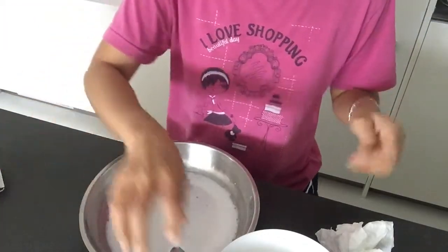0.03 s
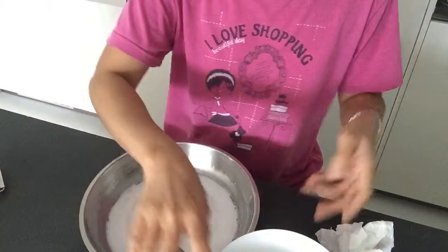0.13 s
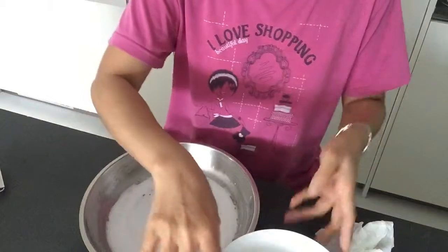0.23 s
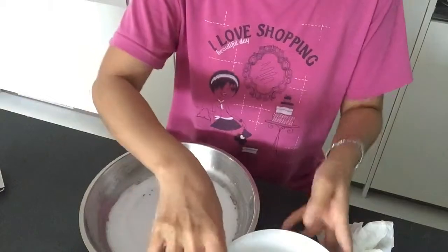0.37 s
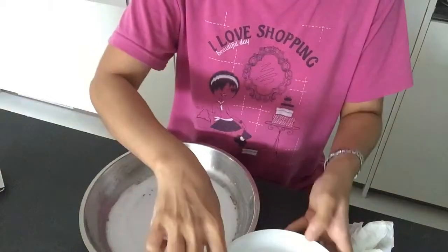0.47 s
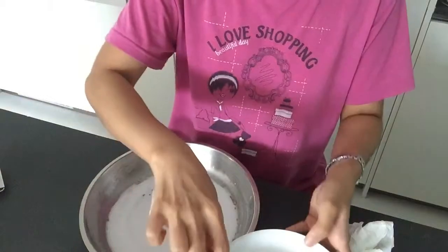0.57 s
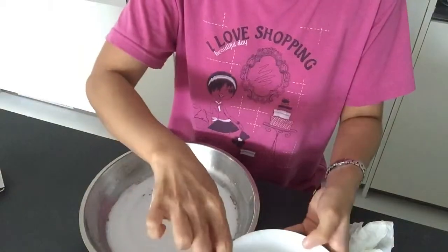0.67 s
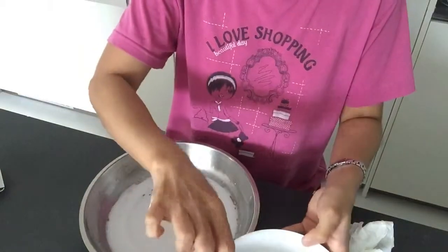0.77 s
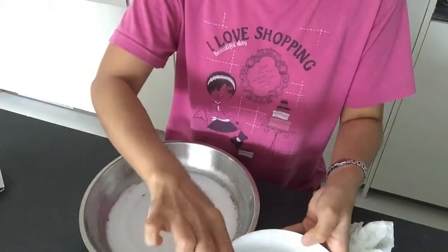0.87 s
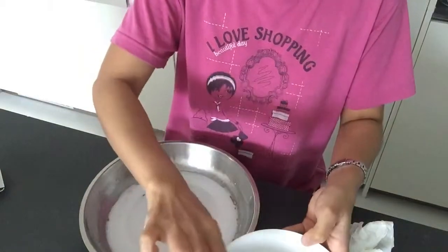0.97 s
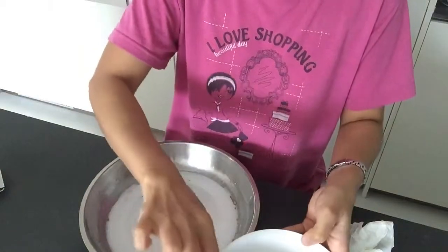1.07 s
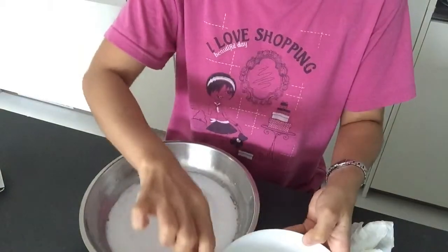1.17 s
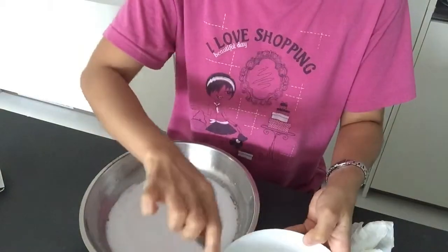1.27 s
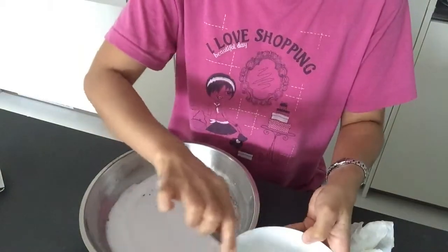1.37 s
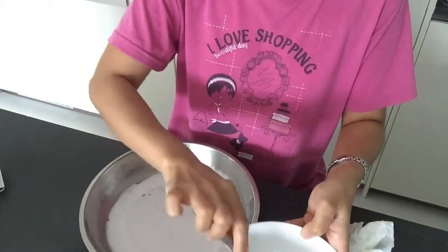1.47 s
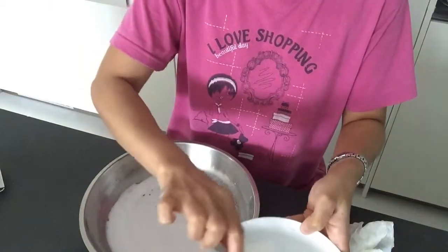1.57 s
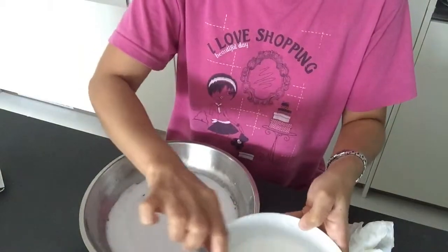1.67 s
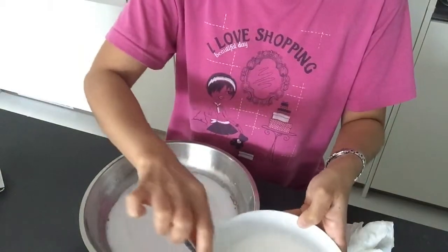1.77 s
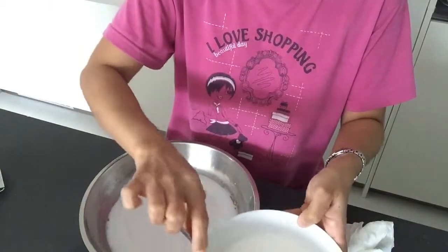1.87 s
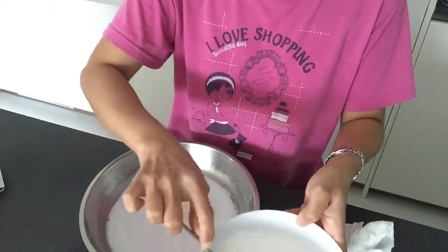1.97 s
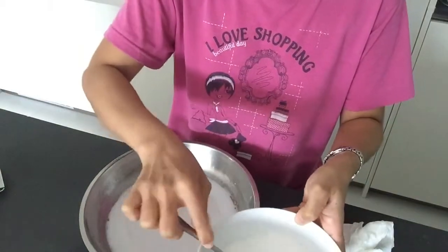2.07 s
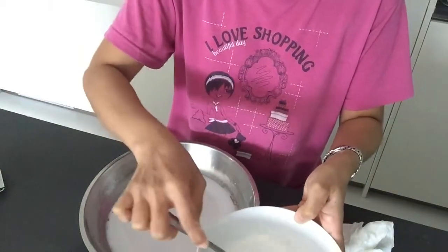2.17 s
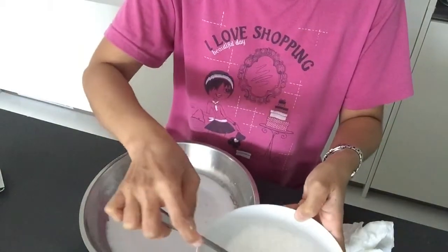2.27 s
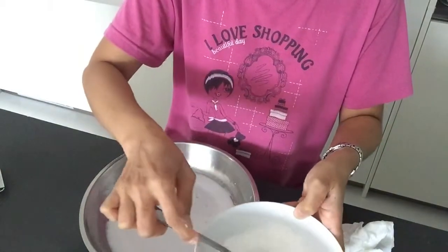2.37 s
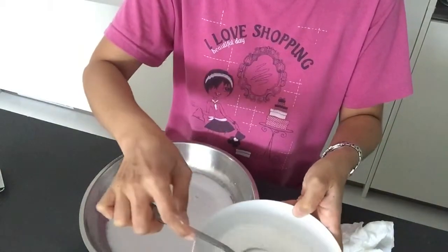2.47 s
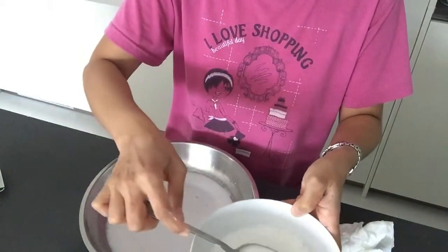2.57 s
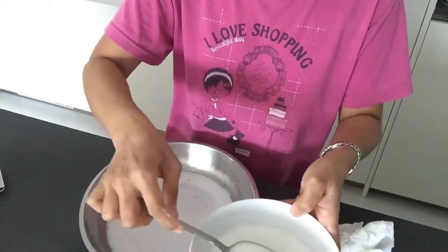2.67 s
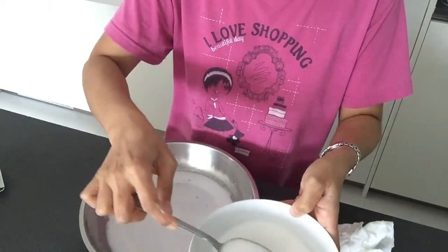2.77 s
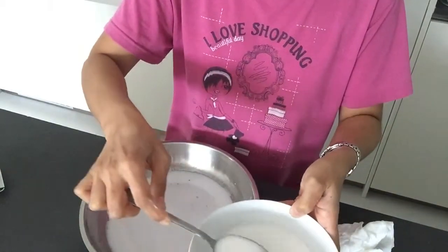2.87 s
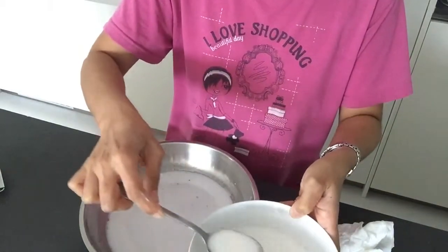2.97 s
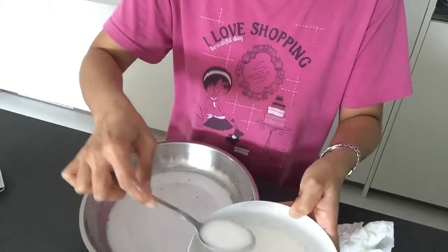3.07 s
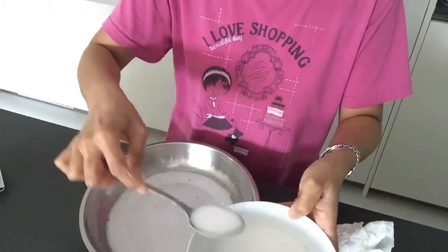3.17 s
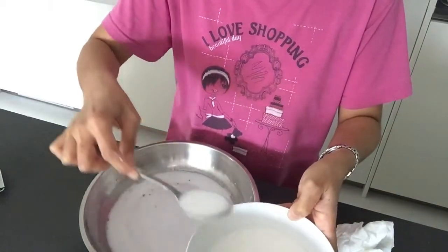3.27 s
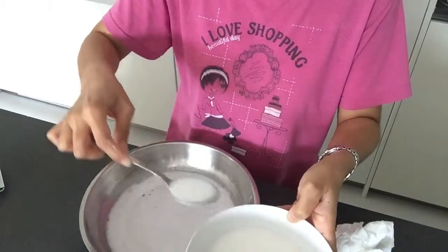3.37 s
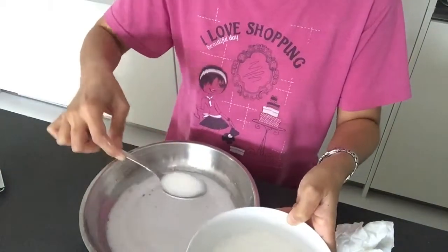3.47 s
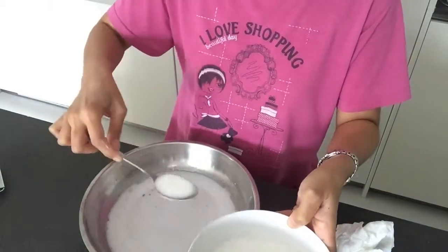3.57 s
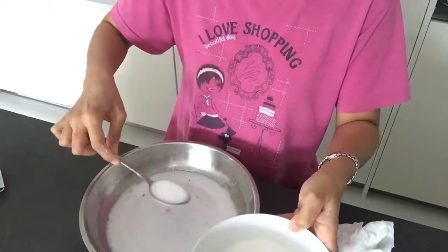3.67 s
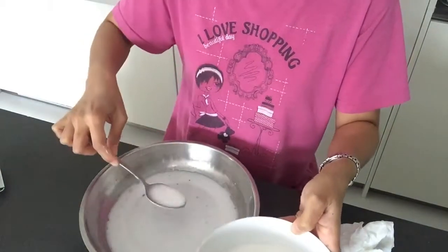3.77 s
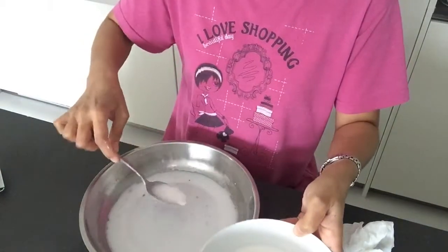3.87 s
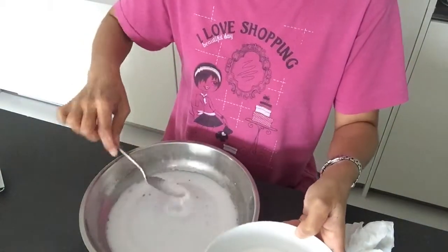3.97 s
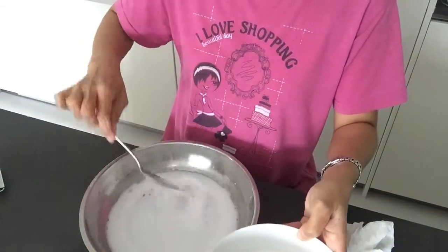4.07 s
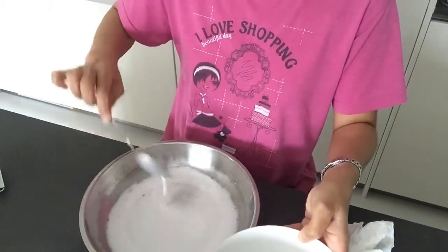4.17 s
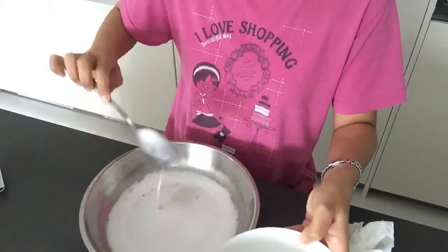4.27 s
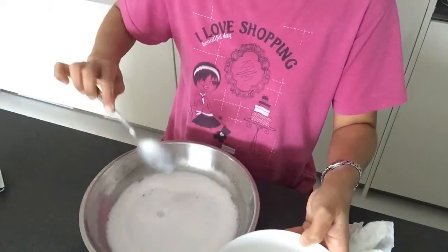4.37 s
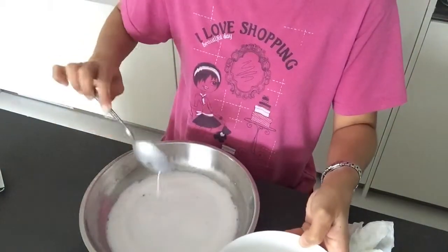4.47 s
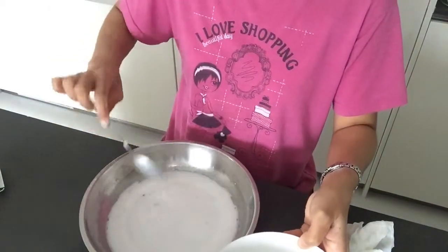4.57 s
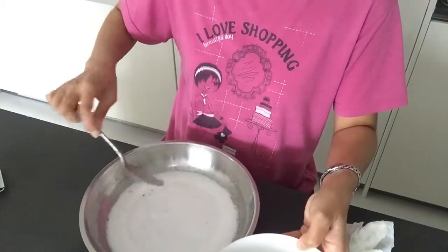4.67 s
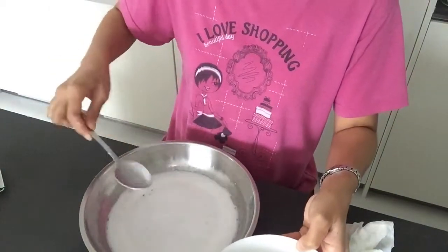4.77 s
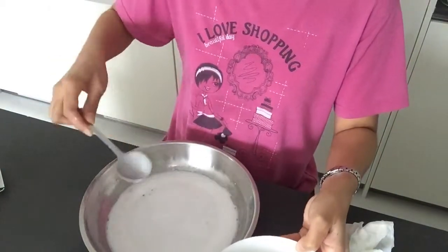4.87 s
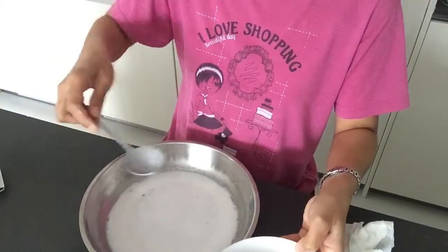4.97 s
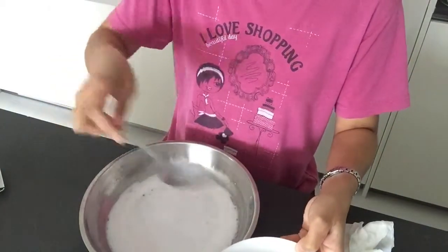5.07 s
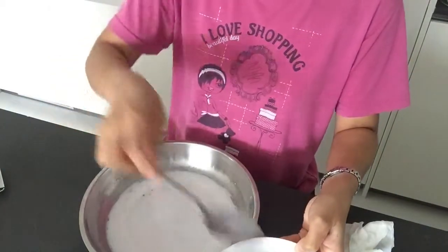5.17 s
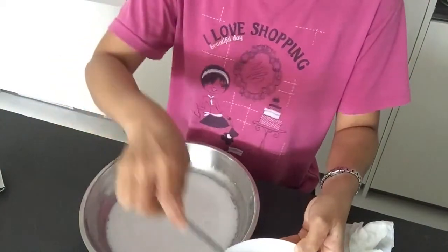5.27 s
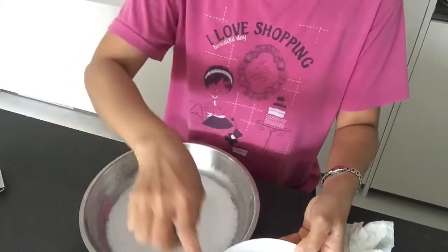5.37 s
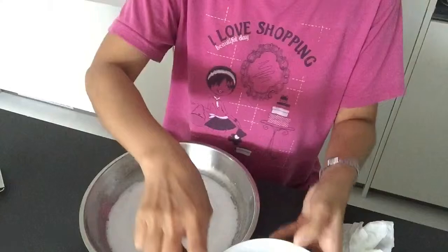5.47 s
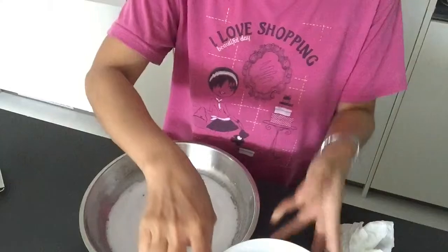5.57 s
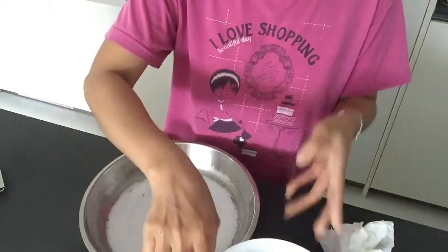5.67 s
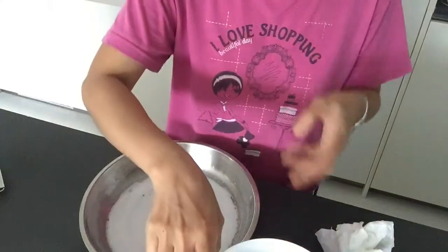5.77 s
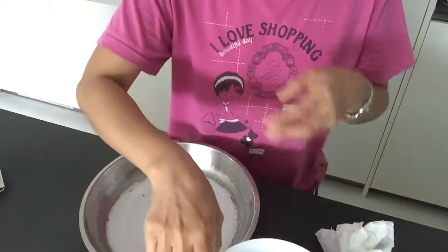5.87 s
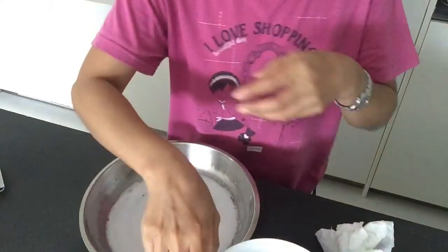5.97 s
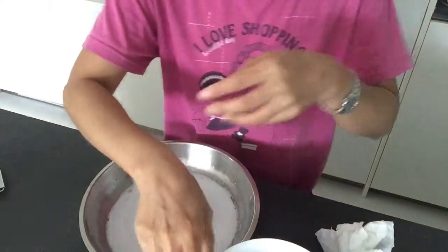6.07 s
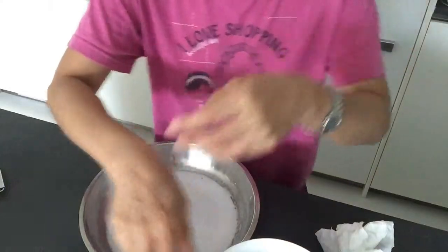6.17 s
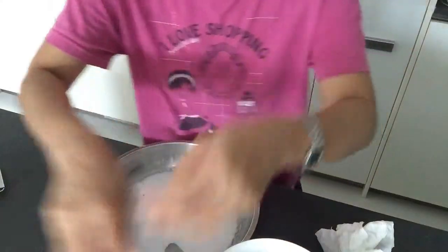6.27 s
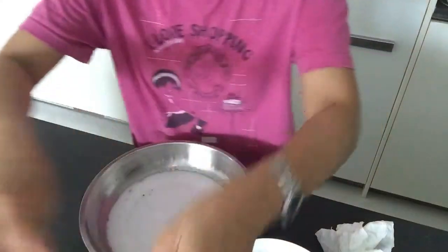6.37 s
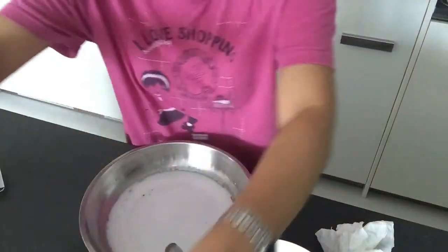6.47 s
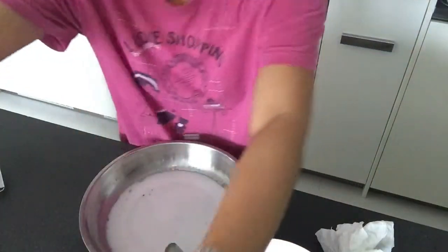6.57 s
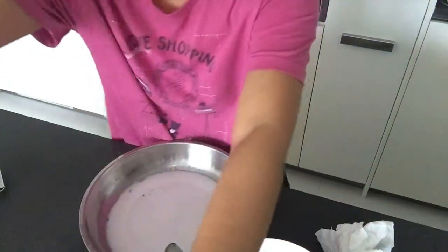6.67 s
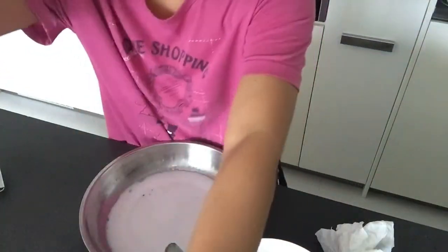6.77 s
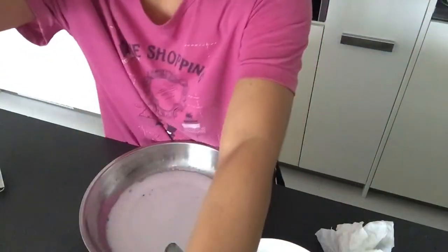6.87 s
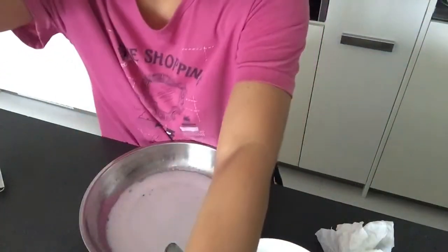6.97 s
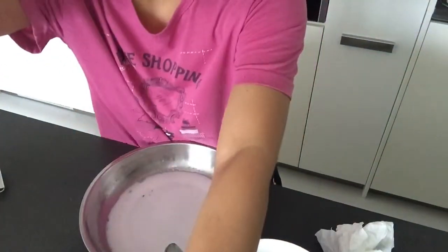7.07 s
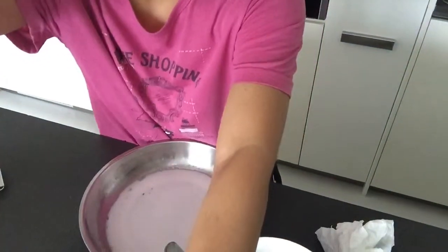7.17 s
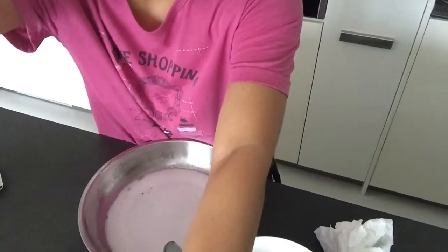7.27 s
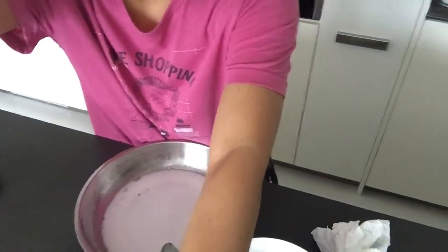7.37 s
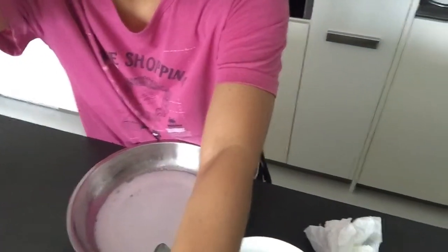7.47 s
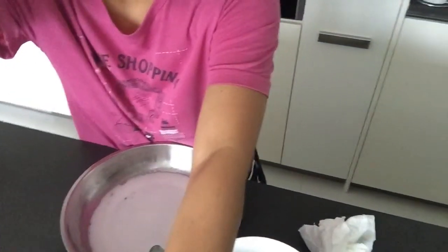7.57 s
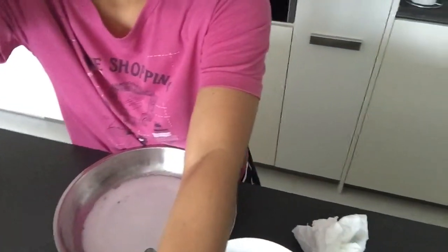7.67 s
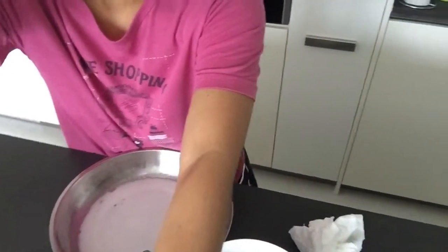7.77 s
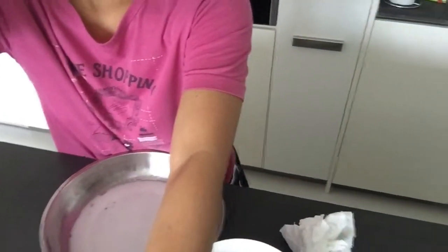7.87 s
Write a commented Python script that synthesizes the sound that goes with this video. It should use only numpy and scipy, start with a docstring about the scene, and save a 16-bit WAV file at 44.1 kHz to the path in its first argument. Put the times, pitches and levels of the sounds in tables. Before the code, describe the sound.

A steel spoon clinks and scrapes in a china bowl, the bowl knocks on a counter, then the dropped spoon rocks to rest, ringing.

```python
"""Batter is spooned from a china bowl into a shallow steel pan in a small kitchen, close to the microphone.
The steel spoon sings as it is picked up, then clinks and scrapes in the bowl (0.7-2.1 s) and frees one
bubble; the batter itself runs silently. The bowl knocks twice on the counter (4.9 s, 5.3 s). The spoon
is dropped in (5.8 s) and rocks to rest, ringing the rim. Soft bumps and a faint clink follow (from 7.4 s).
Room noise, an appliance drone and microphone hiss run throughout."""
import sys
import numpy as np
from scipy import signal
from scipy.fft import rfft, irfft
from scipy.io import wavfile

SR = 44100
rng = np.random.default_rng(int(sys.argv[2]) if len(sys.argv) > 2 else 0)


def to_wav(s):
    """Save 16-bit WAV."""
    ch = np.atleast_2d(s).T  # columns
    pcm = np.round(np.clip(ch, -1, 1) * 32767)  # PCM
    wavfile.write(sys.argv[1], SR, pcm.astype(np.int16))


N = 349272
T = np.arange(N) / SR

# Spoon on bowl. Each row: start in seconds, level in dB, extra bass in dB, tilt in dB per octave,
# frequency favoured by the contact point in Hz, chatter t60 in seconds.
CLINKS = [(0.651, 1, 0.5, 0.7, 2460, 0.012), (1.07, -10, -9, -4, 4100, 0.012),
          (1.078, -10.5, -9, -3, 5500, 0.027), (1.277, -2.5, 1, 6.5, 2100, 0.028),
          (1.329, -13.5, -30, -3.5, 1800, 0.0079), (1.539, -11, -32, -8, 3500, 0.012),
          (1.623, -28.5, 0, 3, 2700, 0.025), (1.98, -2, -1, 5, 4150, 0.0082),
          (2.087, -28.5, 2, 11.5, 6500, 0.025), (2.111, -27, 7, 4.5, 4100, .03),
          (5.786, -1.5, -3, -1.2, 3350, 0.017), (5.804, -9.5, -7, -4.5, 1620, 0.1),
          (6.119, -11.5, -2, -3.5, 2760, 0.074), (6.135, -13, 5, 2, 1900, 0.056),
          (7.678, -33.5, 14.5, -1, 2830, 0.014)]
# Edges of the seven clink bands in Hz.
BAND_EDGES_HZ = [120, 700, 1500, 2350, 3400, 4900, 7000, 16000]
# Colour of a plain clink and of the rocking spoon. Each entry: gain of one band in dB.
CLINK_COLOUR_DB = [-19.5, -13.5, -14, -13, -17, -22, -30]
ROCK_COLOUR_DB = [-16, -21, -12.5, -13, -30, -20, -28.5]
# Damped resonances of spoon and bowl in contact. Each row: frequency in Hz, width in Hz, gain in dB.
CONTACT_MODES = [(170, 190, -10.5), (313, 96, -8.5), (584, 84, -4.5), (727, 235, -5), (1026, 210, 7),
                 (1440, 380, 0.5), (1753, 130, 2.5), (2053, 106, 6), (2614, 290, -4), (2948, 210, -2),
                 (3790, 324, -1.5), (4377, 127, 1), (5480, 420, 4), (6200, 590, 0.5), (7100, 340, -8.5),
                 (8670, 1100, -8), (11660, 220, -12), (14300, 600, -20)]
# Resonances of the spot the rocking spoon lands on. Each row: frequency in Hz, width in Hz, gain in dB.
LANDING_MODES = [(980, 140, 1.5), (3140, 280, 4.5), (5420, 170, 9.5), (6300, 250, -6)]
# Free ring of the bowl. Each row: frequency in Hz, level in dB, t60 in seconds before extra damping.
BOWL_MODES = [(782, 2.5, 1.73), (1020, -35, .4), (1378, -21, 1), (1664, -20, 1.1), (2090, 15, 0.25),
              (2050, -3.5, 0.92), (2400, -16, .3), (2590, -13, .3), (2600, -5, 0.18), (3180, 2, 0.31),
              (3050, -30, 0.31), (3720, -26, .45)]
# Blows on the rim. Each row: start in seconds, level in dB, favoured frequency in Hz,
# fall-off from it in dB per octave.
RIM_BLOWS = [(0.652, -20, 2430, 6.5), (1.071, -34.5, 2100, 16), (1.278, -31.5, 2080, 19),
             (5.787, -23, 1393, 7), (6.120, -28, 2080, 9)]
# Blows that ring the gripped spoon. Each row: start in seconds, level in dB, t60 in seconds,
# tilt in dB per octave.
STEEL_BLOWS = [(0.653, -41, 0.19, 0), (1.073, -36, 0.41, -1), (1.278, -24, 0.44, -3.5),
               (1.981, -27, 0.34, 1)]
# The spoon's clusters of close modes. Each row: centre in Hz, width in Hz, gain in dB.
STEEL_MODES = [(1560, 140, -0.5), (1964, 100, 9.5), (2190, 54, 1), (3910, 160, 9.5), (4300, 63, -27),
               (5600, 150, -23), (6220, 410, -2.5), (8600, 160, -12), (11600, 380, -19)]
# Bowl on counter. Each row: start in seconds, level in dB, factor on t60.
KNOCKS = [(4.9256, 2.5, 0.52), (5.2908, 8, 0.95), (5.2957, -4, 0.73), (5.301, -5, 1.1),
          (5.3106, -2.5, 0.85)]
# Bowl foot and counter, with the lowest rows ringing in the room. Each row: frequency in Hz, level in dB, base
# t60 in seconds.
KNOCK_MODES = [(116, -34, 0.45), (178.4, -31.5, 0.49), (255, -28.5, 0.18), (294, -30, 0.037),
               (380, -25.5, .025), (584, -28, 0.073), (693, -15.5, 0.12), (912, -3.5, 0.022),
               (1008, -1, 0.035), (1200, -11, 0.021), (1516, -10.5, 0.024), (1730, -18.5, 0.016)]
# Spoon dragged round the bowl. Each row: time of full pressure in seconds, hold in seconds, level in dB.
STROKES = [(1.155, .09, -45), (1.259, 0.041, -37), (1.522, .01, -43), (1.74, .03, -53.5),
           (1.912, 0.12, -39)]
# Resonances woken by the dragging. Each row: frequency in Hz, width in Hz, gain in dB.
SCRAPE_MODES = [(1104, 89, -2.5), (1320, 48, -1), (1737, 40, -2.5), (2500, 140, -17), (3400, 310, -14)]
# The spoon's low modes. Each row: frequency in Hz, level in dB.
HUM_MODES = [(1756, 1), (1150, -15.5)]
# Grazes on the spoon. Each row: start in seconds, level in dB, tilt in dB per octave.
GRAZES = [(0.0, -83.5, 22), (0.14, -69.5, -6), (0.441, -59.5, 12), (0.651, -59, -7)]
# The spoon's high modes. Each row: frequency in Hz, level in dB, t60 in seconds.
TING_MODES = [(3870, -8, 0.78), (4750, 7.5, 1), (5911, 1, .26), (9030, 7, 0.35)]
# Bumps through the counter. Each row: start in seconds, level in dB, swell in seconds.
BUMPS = [(7.361, -44.5, 0.0078), (7.473, -22.5, 0.0035), (7.515, -44, 0.0095), (7.726, -27.5, 0.006),
         (7.787, -40.5, 0.0037), (7.889, -27, 0.0016), (7.895, -24.5, 0.006)]
# Fingers and bracelet. Each row: peak time in seconds, half-width in seconds, level in dB, centre in Hz.
BRUSHES = [(0.004, .06, -54, 9000), (0.477, 0.034, -46.5, 5200), (3.903, .004, -59, 14500),
           (6.445, .035, -54, 13200), (6.6, .035, -55.5, 13200)]
# Room noise and microphone hiss. Each row: frequency in Hz, relative spectral density in dB.
AIR_SPECTRUM = [(24, -30.5), (40, 0), (70, -8), (92, -1), (281, -8), (404, -8.5), (426, -5), (549, -13.5),
                (961, -12), (1310, -16.5), (3000, -15.5), (3900, -55.5), (6600, -120)]
HISS_SPECTRUM = [(1760, -33), (3000, -6.5), (3330, -0.5), (3970, 1), (4660, -6.5), (5960, -2.5),
                 (10400, -15.5), (11800, -14.5), (15000, -18), (16000, -18.5)]
# Appliance drone. Each row: frequency in Hz, level in dB.
DRONE_TONES = [(48, -65), (100, -59.5)]
# Kitchen reverberation. Each row: frequency in Hz, t60 in seconds, level in dB.
REVERB = [(120, 0.21, 2), (300, 0.51, 2.5), (706, 0.51, -5.5), (1340, 0.56, -9.5), (2543, 0.45, -5.5),
          (4000, 0.42, -6), (6960, 0.35, -9.5), (14000, .22, -4)]


def clinks(favour_db=7, favour_octaves=0.35):
    """Single blows of the spoon; the contact point colours each."""
    out = np.zeros(N)
    for start_s, db, bass_db, tilt_db, favoured_hz, chatter_t60_s in CLINKS:
        boost_db = favour_db * np.exp(-(band_octaves(favoured_hz) / favour_octaves) ** 2)
        colour_db = np.array(CLINK_COLOUR_DB) + boost_db
        colour_db[0] += bass_db
        add(out, start_s, contact(db, colour_db, tilt_db, chatter_t60_s))
    return out


def contact(db, colour_db, tilt_db, chatter_t60_s, trim_db=-14.5, pivot_hz=2800):
    """One clink: an impulse, then steel buzzing briefly against china."""
    t = T[:SR // 20]
    force = 0.56 * rng.standard_normal(len(t)) * fade(t, chatter_t60_s)
    force[0] += 1
    body = resonate(force, CONTACT_MODES)
    gains = from_db(db + trim_db + np.array(colour_db) + tilt_db * band_octaves(pivot_hz))
    return sum(gain * rms_one(band(body, low_hz, high_hz, order=4))
               for gain, low_hz, high_hz in zip(gains, BAND_EDGES_HZ, BAND_EDGES_HZ[1:]))


def rocking(first_db=-8.5, loss_db=6, rebound_s=0.012, far_end_share=0.56):
    """Each swing, weaker and duller: a landing, a thinner rebound, a soft touch of the other end."""
    out = np.zeros(N)
    for k, start_s, swing_s in swings():
        db = first_db - k * loss_db
        tilt_db = -k  # 1 dB per octave duller each swing
        landing = contact(db, ROCK_COLOUR_DB, tilt_db, chatter_t60_s=0.049)
        rebound = contact(-5 - 10 * k, CLINK_COLOUR_DB, tilt_db + 1.5, chatter_t60_s=0.086)
        far_end = contact(db - 13, ROCK_COLOUR_DB, tilt_db=-3, chatter_t60_s=0.08)
        add(out, start_s, landing + sum(resonate(landing, [mode]) for mode in LANDING_MODES))
        add(out, start_s + rebound_s, rebound)
        add(out, start_s + far_end_share * swing_s, far_end)
    return out


def swings(start_s=6.1705, first_s=0.133, ratio=0.66, count=6):
    """The loose spoon's shrinking swings. Each row: index, start in seconds, length in seconds."""
    lengths_s = first_s * ratio ** np.arange(count)
    starts_s = start_s + np.cumsum(lengths_s) - lengths_s
    return list(zip(range(count), starts_s, lengths_s))


def rim(free_db_per_s=7, touched_db_per_s=76, landing_db=-24, loss_db=6.5, landing_hz=2090):
    """The struck rim rings on; fingers or spoon against it damp it."""
    free = (T > 5.78) & (T < 6.12)
    damping_db = np.cumsum(np.where(free, free_db_per_s, touched_db_per_s)) / SR
    landings = [(start_s, landing_db - k * loss_db, landing_hz, 33) for k, start_s, _ in swings()]
    out = np.zeros(N)
    for start_s, db, favoured_hz, fall_db in list(RIM_BLOWS) + landings:
        modes = [(hz, mode_db - fall_db * abs(np.log2(hz / favoured_hz)), t60_s)
                 for hz, mode_db, t60_s in BOWL_MODES]
        lost_db = damping_db[round(start_s * SR):][:SR]
        add(out, start_s, from_db(db - lost_db + lost_db[0]) * ring(modes, tilt_db=-3.5))
    return out


def steel_shimmer(landing_db=-29.5, loss_db=11.5):
    """Hard clinks and landings leave many close spoon modes beating briefly."""
    landings = [(start_s, landing_db - k * loss_db, 0.34, 7.5) for k, start_s, _ in swings()]
    out = np.zeros(N)
    for start_s, db, t60_s, tilt_db in list(STEEL_BLOWS) + landings:
        modes = [(hz, width_hz, mode_db + tilt_db * np.log2(hz / STEEL_MODES[0][0]))
                 for hz, width_hz, mode_db in STEEL_MODES]
        shimmer = rms_one(resonate(rng.standard_normal(SR), modes))
        add(out, start_s, from_db(db) * shimmer * fade(T[:SR], t60_s))
    return out


def knocks():
    """The bowl lands on one edge, then drops flat with quick bounces; the soft contact is dull."""
    out, t = np.zeros(N), T[:SR]
    for start_s, db, t60_factor in KNOCKS:
        for hz, mode_db, t60_s in KNOCK_MODES:
            velocity = np.cos(2 * np.pi * hz * t)  # air follows surface speed: starts at the crest
            add(out, start_s, from_db(db + mode_db) * velocity * fade(t, t60_s * t60_factor))
    return band(out + 1e-18, low_hz=95, high_hz=1700, order=4)


def scrape(slips_per_s=1500, spread_db=3.5, rise_db_per_s=310, fall_db_per_s=151):
    """Tiny slips of spoon on glaze, muffled by batter; each stroke swells, holds and eases off."""
    slipping = rng.random(N) < slips_per_s / SR
    slips = slipping * from_db(spread_db * rng.standard_normal(N)) * rng.choice([-1, 1], N)
    strokes_db = [db - rise_db_per_s * np.maximum(full_s - T, 0)
                  - fall_db_per_s * np.maximum(T - full_s - hold_s, 0) for full_s, hold_s, db in STROKES]
    pressure = from_db(np.max(strokes_db, axis=0))
    return pressure * rms_one(resonate(slips + 1e-18, SCRAPE_MODES))


def spoon_hum(level_db=-47, edge_on_s=0.51, half_turn_s=0.73, grip_s=0.66, grip_db_per_s=81):
    """The lifted spoon hums as it turns, silent when edge-on, and dies away in the grip."""
    level = from_db(level_db - grip_db_per_s * np.maximum(T - grip_s, 0))
    facing = np.sin(np.pi * (T - edge_on_s) / half_turn_s)
    tones = sum(from_db(db) * np.sqrt(2) * np.sin(2 * np.pi * hz * T) for hz, db in HUM_MODES)
    return level * facing * tones


def spoon_tings(swell_s=0.0021, beat_hz=13.1):
    """Grazes swell into short high tings; the second mode beats against a close twin."""
    out = np.zeros(N)
    swell = 1 - np.exp(-T[:SR] / swell_s)
    hz, mode_db, t60_s = TING_MODES[1]
    for start_s, db, tilt_db in GRAZES:
        twin_db = mode_db + tilt_db * np.log2(hz / TING_MODES[0][0])
        twin = ring([(hz + beat_hz, twin_db, t60_s)], tilt_db=0)
        add(out, start_s, from_db(db) * (ring(TING_MODES, tilt_db) - twin) * swell)
    return out


def bumps(start_hz=560, end_hz=55, glide_s=0.00387):
    """Bending waves in the counter carry highs faster, so each bump arrives as a falling chirp."""
    out, t = np.zeros(N), T[:SR // 10]
    pitch_hz = end_hz + (start_hz - end_hz) * np.exp(-t / glide_s)
    chirp = np.sin(2 * np.pi * np.cumsum(pitch_hz) / SR)
    for start_s, db, swell_s in BUMPS:
        envelope = t / swell_s * np.exp(1 - t / swell_s)
        add(out, start_s, from_db(db) * chirp * envelope)
    return band(out + 1e-18, 24, start_hz)


def bubble(start_s=2.089, db=-29.5, hz=1320, t60_s=0.089, rise_per_s=6):
    """An air pocket under the lifting spoon rings, rising in pitch as it surfaces."""
    out, t = np.zeros(N), T[:SR // 10]
    cycles = hz * (t + rise_per_s * t * t / 2)
    add(out, start_s, from_db(db) * np.sin(2 * np.pi * cycles) * fade(t, t60_s))
    return out


def brushes(edge_ratio=1.25):
    """Fingers and bracelet brush lightly: short swells of friction hiss."""
    out = np.zeros(N)
    for peak_s, half_width_s, db, hz in BRUSHES:
        swell = np.exp(-((T - peak_s) / half_width_s) ** 2)
        hiss = rms_one(band(rng.standard_normal(N), hz / edge_ratio, hz * edge_ratio))
        out += from_db(db) * swell * hiss
    return out


def kitchen(dry, wet_db, early_db=-2, early_t60_s=0.13, onset_s=0.0028):
    """Quick reflections off counter and cupboards, then a tail that dies sooner in the treble."""
    t, edges_hz = T[:SR], np.geomspace(70, 17000, 17)
    white, response = rng.standard_normal((2, SR)), np.zeros(SR)
    onset = np.clip(t / onset_s - 0.5, 0, 1)
    early = from_db(early_db) * fade(t, early_t60_s)
    for k, (low_hz, high_hz) in enumerate(zip(edges_hz, edges_hz[1:])):
        hz = np.sqrt(low_hz * high_hz)
        tail = band(white[k % 2], low_hz, high_hz) * (fade(t, at_hz(REVERB, hz)) + early) * onset
        width_gain = np.sqrt(2 * (high_hz - low_hz)) / SR  # energy in proportion to bandwidth
        response += from_db(at_hz(REVERB, hz, column=2)) * rms_one(tail) * width_gain
    return dry + from_db(wet_db) * signal.fftconvolve(dry, response)[:N]


def background(air_db=-51, hiss_db=-57):
    """Steady room noise, a faint appliance drone and microphone hiss."""
    air = from_db(air_db) * steady_noise(AIR_SPECTRUM)
    drone = sum(from_db(db) * np.sin(2 * np.pi * hz * T) for hz, db in DRONE_TONES)
    hiss = from_db(hiss_db) * steady_noise(HISS_SPECTRUM)
    return air + drone + hiss


def steady_noise(spectrum):
    """Coloured noise of unit rms."""
    gains = from_db(at_hz(spectrum, np.fft.rfftfreq(N, 1 / SR)))
    return rms_one(irfft(rfft(rng.standard_normal(N)) * gains, N))


def resonate(x, modes):
    """Parallel resonators of alternating sign."""
    out = 0
    for k, (hz, width_hz, db) in enumerate(modes):
        radius = np.exp(-np.pi * width_hz / SR)
        poles = [1, -2 * radius * np.cos(2 * np.pi * hz / SR), radius ** 2]
        gain = (-1) ** k * from_db(db) * (1 - radius ** 2) / 2
        out = out + gain * signal.lfilter([1, 0, -1], poles, x)
    return out


def ring(modes, tilt_db):
    """One second of struck modes, tilted by tilt_db per octave above the first."""
    t, first_hz = T[:SR], modes[0][0]
    return sum(from_db(db + tilt_db * np.log2(hz / first_hz)) * np.sin(2 * np.pi * hz * t) * fade(t, t60_s)
               for hz, db, t60_s in modes)


def band(x, low_hz, high_hz, order=2):
    """Causal band-pass."""
    return signal.sosfilt(signal.butter(order, [low_hz, high_hz], "band", fs=SR, output="sos"), x)


def band_octaves(hz):
    """Octaves from hz up to the centre of each clink band."""
    edges_hz = np.array(BAND_EDGES_HZ)
    return np.log2(np.sqrt(edges_hz[:-1] * edges_hz[1:]) / hz)


def at_hz(rows, hz, column=1):
    """Interpolate a table column over log frequency."""
    rows = np.array(rows)
    return np.interp(np.log(hz + 1e-9), np.log(rows[:, 0]), rows[:, column])


def add(out, start_s, sound):
    """Mix a sound in at start_s."""
    start = round(start_s * SR)
    out[start:start + len(sound)] += sound[:N - start]


def fade(t, t60_s):
    """Exponential decay, 60 dB down at t60_s."""
    return np.exp(-np.log(1000) * t / t60_s)


def from_db(db):
    """Decibels to gain."""
    return 10 ** (np.asarray(db) / 20)


def rms_one(x):
    """Scale to unit rms."""
    return x / np.sqrt(np.mean(x ** 2) + 1e-20)


def scene():
    """Mono mix: spooning, rocking and knocks reverberate in the kitchen; the rest is direct."""
    spooning = kitchen(clinks() + scrape() + bubble(), wet_db=-0.4)
    settling = kitchen(rocking(), wet_db=0)
    set_down = kitchen(knocks(), wet_db=1.5)
    ringing = rim() + steel_shimmer() + spoon_hum() + spoon_tings()
    return (spooning + settling + set_down + ringing + brushes() + bumps() + background())[None]


def record(dry, low_cut_hz=44, high_cut_hz=16000):
    """The loudest knocks overload the input; the lowest bass and the top are cut."""
    clipped = np.clip(dry, -1, 1)
    thinned = signal.sosfilt(signal.butter(2, low_cut_hz, "high", fs=SR, output="sos"), clipped)
    return signal.sosfilt(signal.ellip(10, 0.1, 70, high_cut_hz, fs=SR, output="sos"), thinned)


dry = scene()
out = record(dry)
to_wav(out)
```